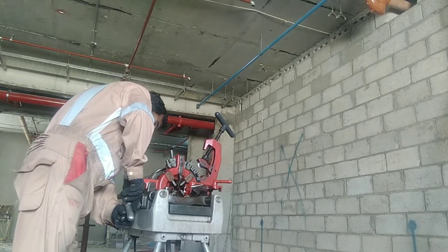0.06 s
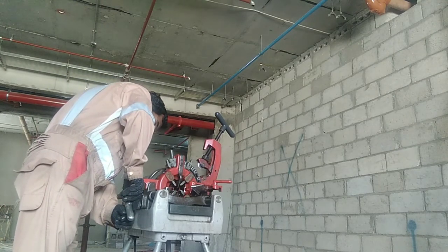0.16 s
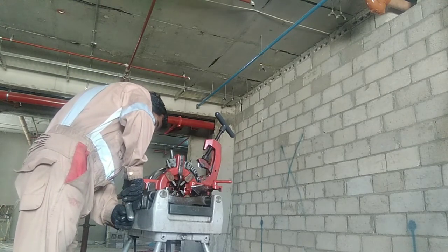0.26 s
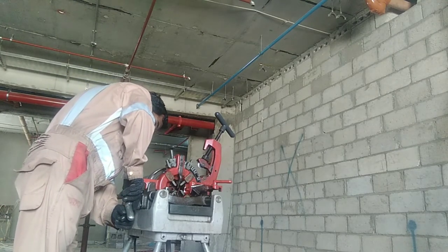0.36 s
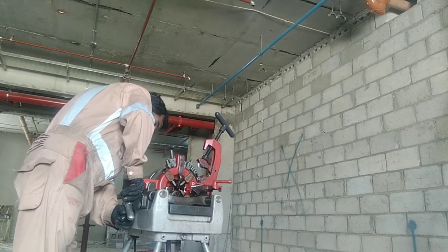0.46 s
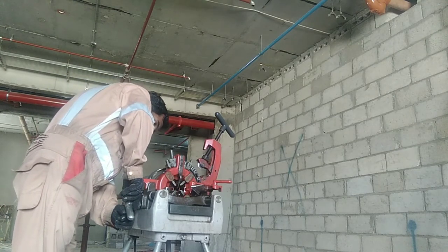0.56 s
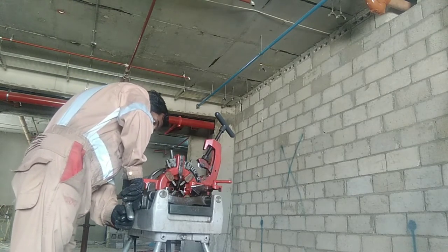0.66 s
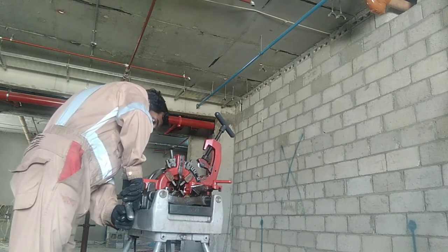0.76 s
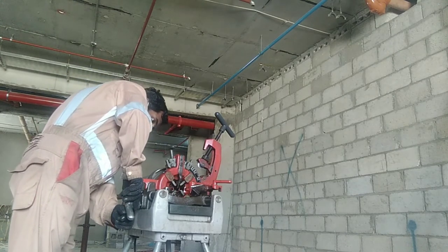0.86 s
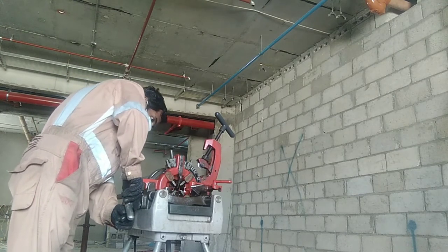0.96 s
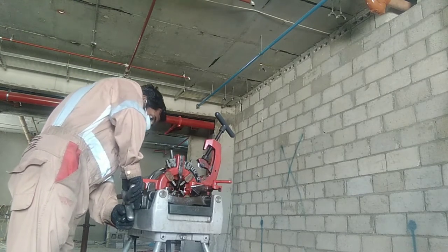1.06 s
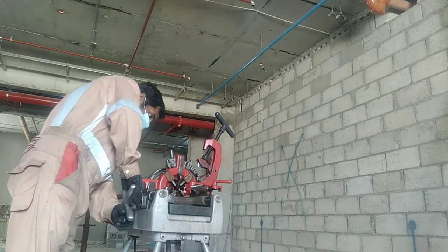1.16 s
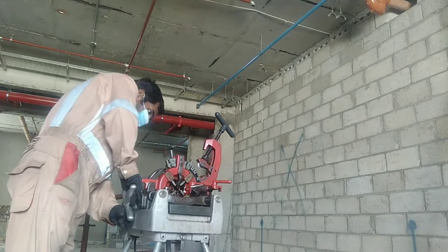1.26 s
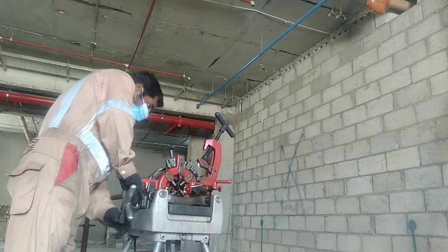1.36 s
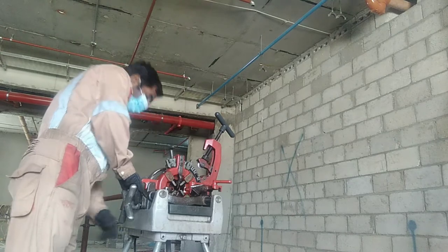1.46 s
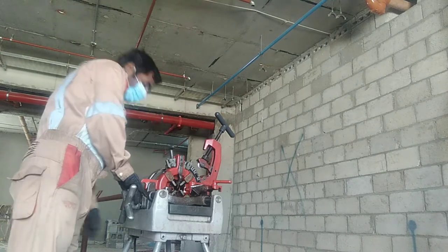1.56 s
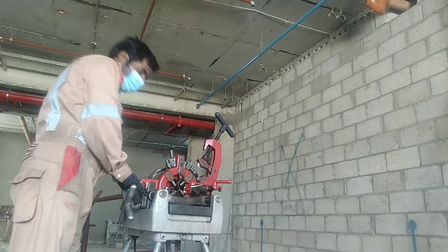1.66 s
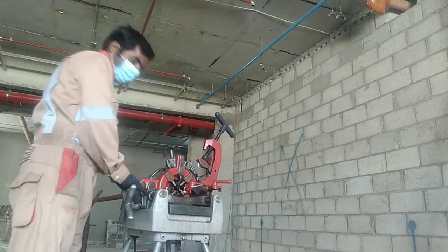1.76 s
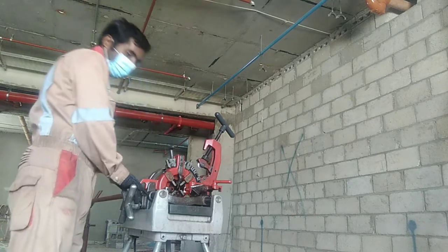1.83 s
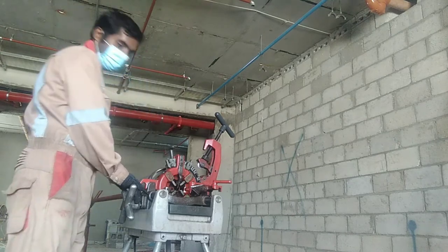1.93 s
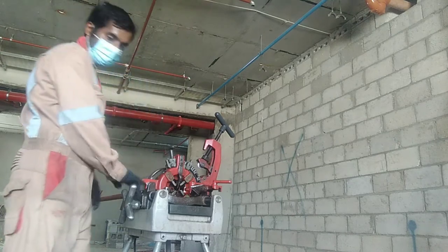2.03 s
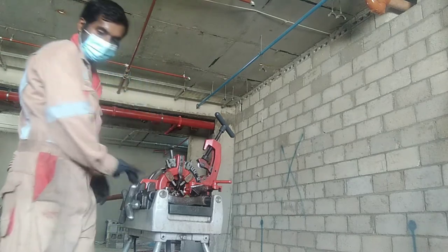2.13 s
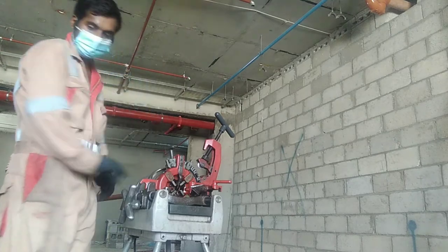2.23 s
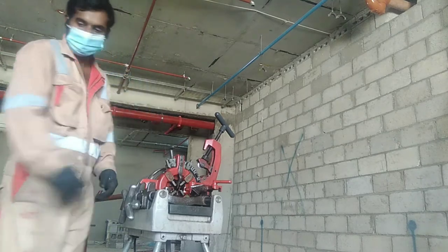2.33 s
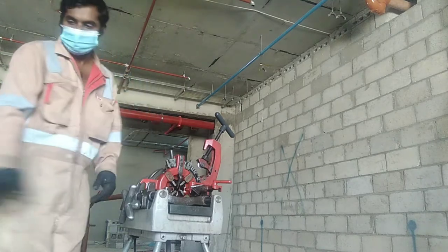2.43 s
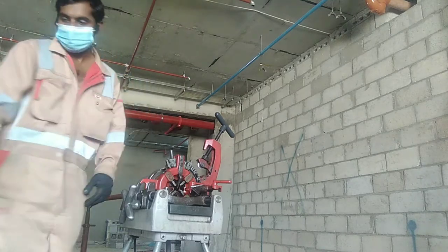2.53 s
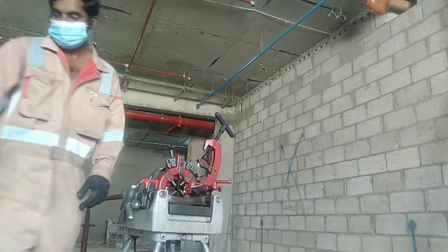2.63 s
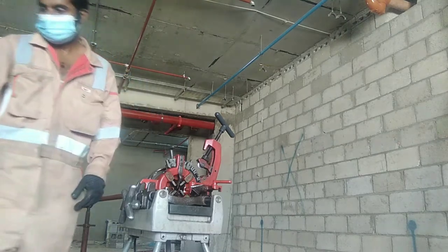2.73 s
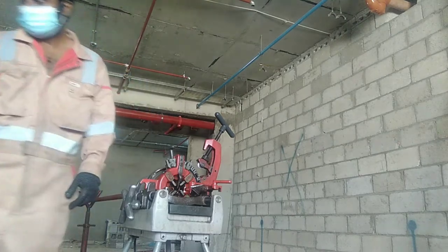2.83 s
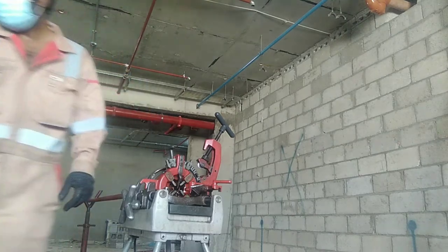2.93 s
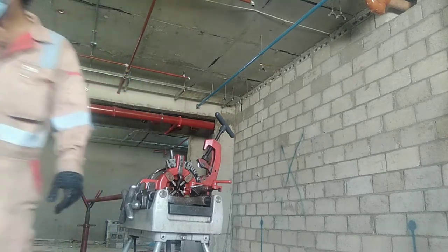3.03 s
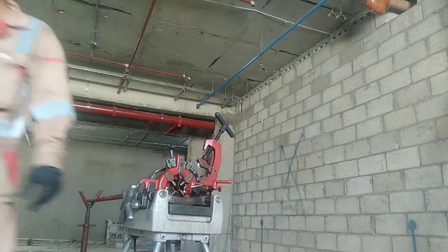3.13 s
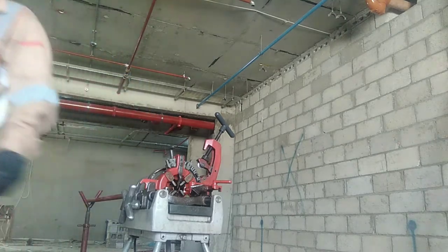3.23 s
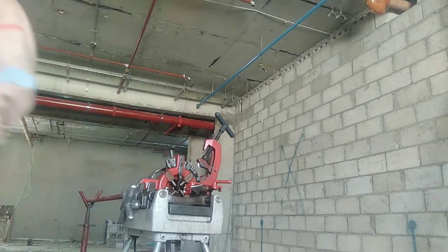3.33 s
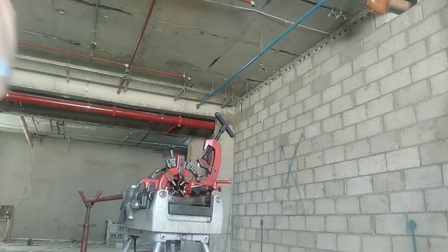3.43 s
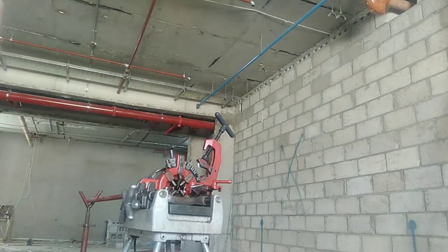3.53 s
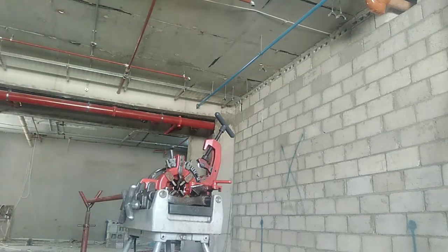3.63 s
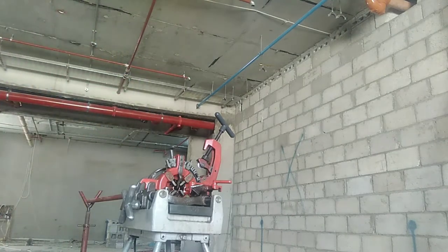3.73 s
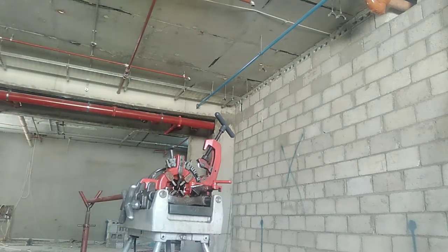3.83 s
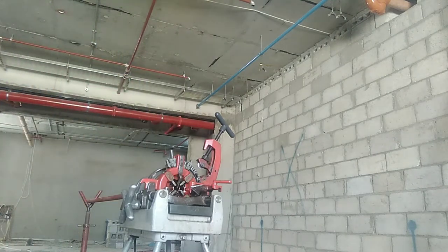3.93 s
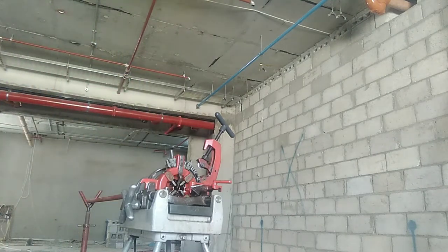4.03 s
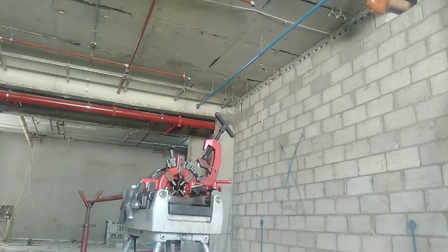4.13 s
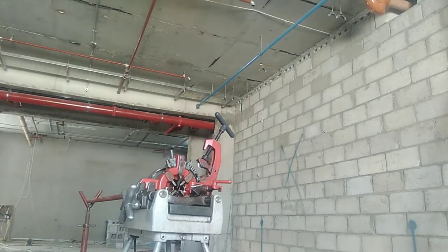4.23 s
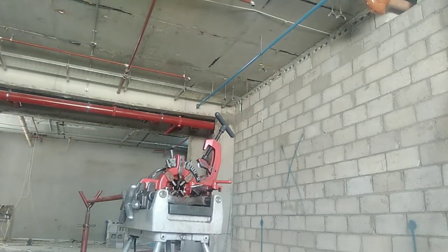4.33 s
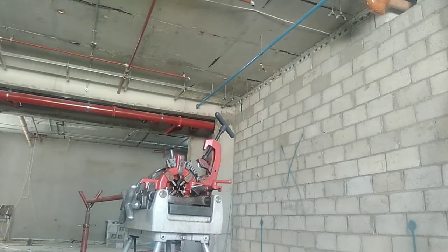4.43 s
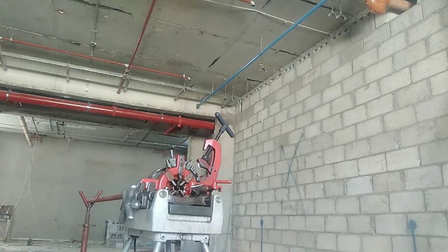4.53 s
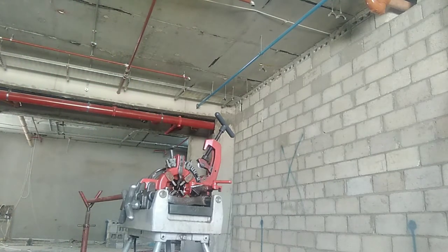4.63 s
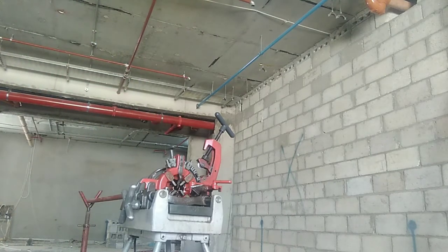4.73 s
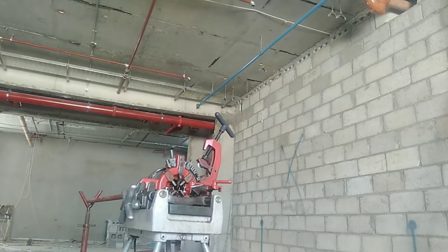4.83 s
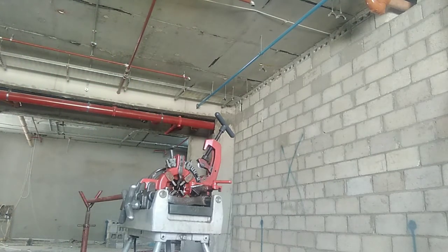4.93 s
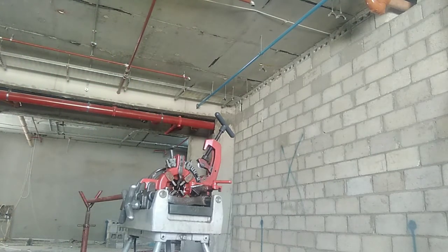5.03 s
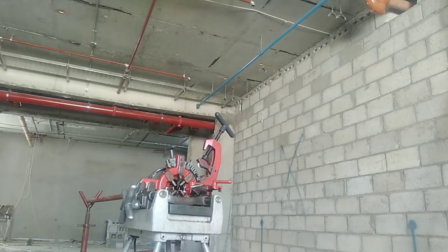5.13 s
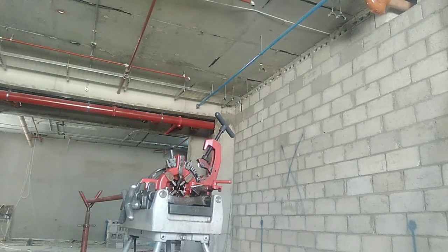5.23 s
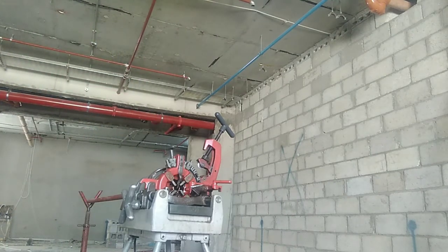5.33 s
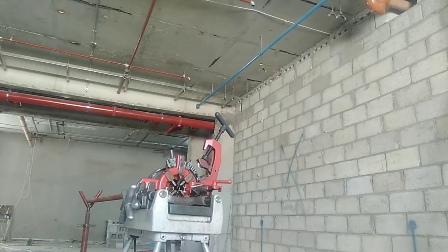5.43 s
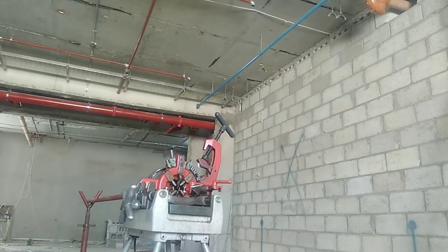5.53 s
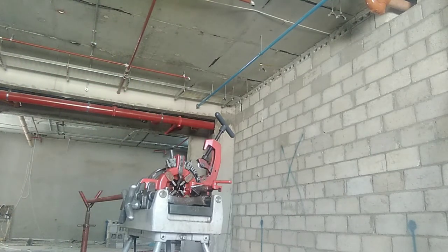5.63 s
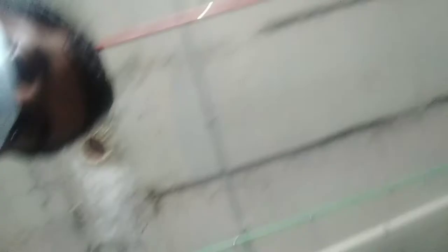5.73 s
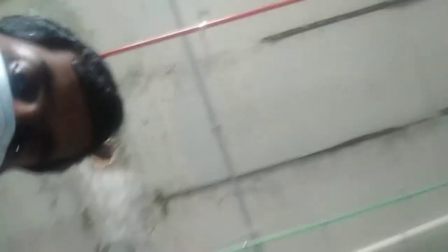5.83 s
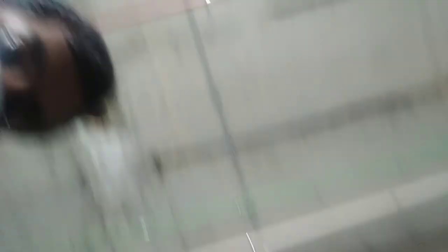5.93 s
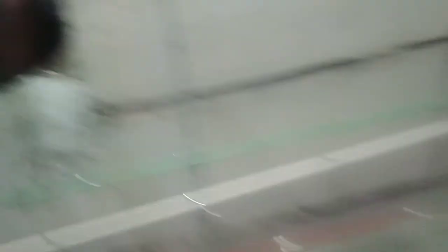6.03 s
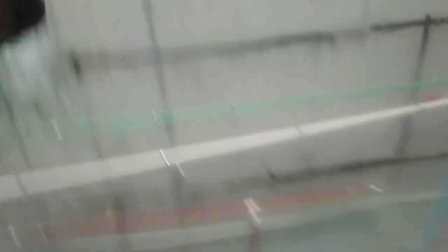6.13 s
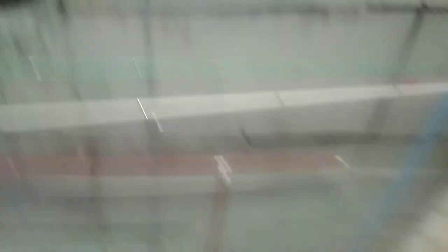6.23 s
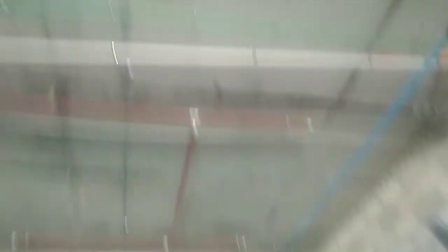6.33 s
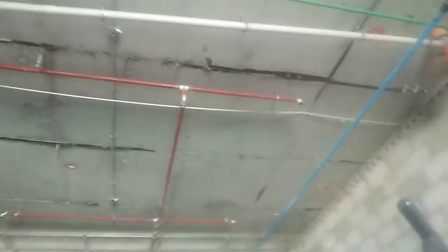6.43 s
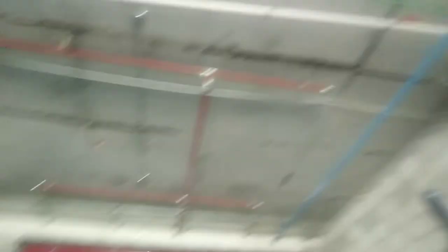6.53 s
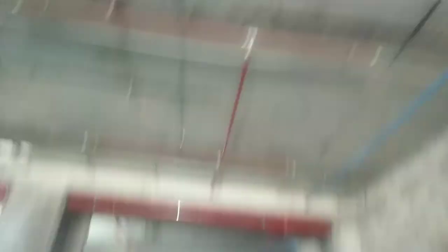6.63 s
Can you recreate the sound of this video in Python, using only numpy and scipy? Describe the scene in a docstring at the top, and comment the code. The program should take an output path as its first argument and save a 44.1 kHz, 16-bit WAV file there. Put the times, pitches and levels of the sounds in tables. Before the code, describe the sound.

In a bare, reverberant concrete hall, an electric pipe-threading machine runs with a rough gear growl and high wavering whine, sagging slightly in pitch. Dull thuds and a click come before it is switched off around two seconds; the whine slides down and dies. Then come steel clanks, hollow knocks, scuffs, ticks and three thin falling chirps, with close handling noise at the end. Stationary device microphone, stereo, with quiet tails thinned.

```python
"""An electric pipe-threading machine growls and whines in a bare concrete hall: gear noise, tooth and slot tones
all follow one rotor speed, which sags under power. Thuds and one click in the machine come while it runs. Switched
off at 2.08 s, it coasts to rest by drag and dry friction; its gear tone lingers in the hall. Steel clanks, ringing
modes, knocks, sharp ticks and scuffs follow. Shaped noise bursts make these blows and the lingering tone;
three falling chirps are swept sines. Convolution with decaying noise is the echo."""
import sys
import numpy as np
from scipy import signal
from scipy.fft import rfft, irfft, next_fast_len
from scipy.io import wavfile
from scipy.ndimage import uniform_filter1d

SR = 44100
rng = np.random.default_rng(int(sys.argv[2]) if len(sys.argv) > 2 else 0)


def inscribe(sig):
    """Save sig as 16-bit PCM at rate SR to the path in sys.argv[1].

    A 1-D sig is mono; a 2-D sig holds one channel per row.
    Samples are clipped to [-1, 1] before scaling.
    """
    pcm = np.round(np.clip(np.atleast_2d(sig).T, -1, 1) * 32767)
    wavfile.write(sys.argv[1], SR, pcm.astype(np.int16))


N = 295029
TIME = np.arange(N) / SR  # s
OFF_S = 2.08  # the power is cut
RUN_HZ = 314  # reference rotor speed, turns per second

# Level difference of the two ports. Each row: frequency in Hz, left minus right in dB.
PORT_BALANCE = [(60, -2.5), (110, 3), (200, -3), (370, 0.5), (680, -2.5), (1250, -2), (2290, -3),
                (4210, -14), (7730, -15), (14200, -6)]


def amp(db):
    """Logarithmic level: decibels to amplitude gain."""
    return 10 ** (np.asarray(db) / 20)


def read(points, hz):
    """Spectral envelope: a table interpolated on a log-frequency axis."""
    f, value = np.transpose(points)
    return np.interp(np.log(hz + 1), np.log(f + 1), value)


def curve(rows):
    """Linear interpolation of a control table at every sample."""
    return np.interp(TIME, *np.transpose(rows))


def evened(x):
    """Normalisation: the mean of the channels gets rms 1."""
    centre = np.atleast_2d(x).mean(0)
    return x / np.sqrt(np.mean(centre ** 2) + 1e-20)


def add(mix, s, sound):
    """Superposition: lays a sound into the mix at time s."""
    part = mix[..., round(s * SR):][..., :sound.shape[-1]]
    part += sound[..., :part.shape[-1]]


def drift(rate_hz):
    """Low-passed Gaussian noise: a slow random fluctuation of rms 1."""
    coarse = TIME[::8]
    size = next_fast_len(len(coarse))
    hz = np.fft.rfftfreq(size, coarse[1])
    spectrum = rfft(rng.standard_normal(size)) / (1 + (hz / rate_hz) ** 4)
    slow = irfft(spectrum, size)[:len(coarse)]
    return np.interp(TIME, coarse, evened(slow))


def lifts(modes, hz):
    """Resonance: the dB that a set of bell-shaped modes adds to a spectrum."""
    return sum(db / (1 + (2 * (hz - f) / width) ** 2) for f, width, db in modes)


def sides(db):
    """Intensity stereo: left and right gains for a level difference, at constant mean power."""
    g = amp(np.array([[.5], [-.5]]) * db)
    return g / np.sqrt((g ** 2).mean(0))


def noise(colour_db, size=N):
    """Partial coherence: coloured noise at two ports, more alike in the bass than in most of the treble."""
    # Each row: frequency in Hz, left-right likeness from 0 to 1.
    likeness = [(60, 0.87), (130, 0.78), (290, 0.79), (620, 0.75), (1360, 0.046), (2980, 0.39),
                (6500, 0.45), (14200, 0.18)]
    hz = np.fft.rfftfreq(size, 1 / SR)
    a, b = rfft(rng.standard_normal((2, size)))
    same = np.clip(read(likeness, hz), 0, 1)
    pair = np.array([a, same * a + np.sqrt(1 - same ** 2) * b])
    coloured = pair * sides(read(PORT_BALANCE, hz)) * amp(colour_db(hz))
    return evened(irfft(coloured, size))


def hall(x, share=1):
    """Diffuse reverberation: noise whose bands each decay at their own rate; share shortens the tail."""
    # Full decay times. Each row: frequency in Hz, time to fall 60 dB in seconds.
    decay_times = [(100, 0.42), (400, 0.63), (1200, 1.84), (2100, 1.97), (2900, 1.85), (4000, 1.06),
                   (6000, 0.83), (12000, 0.87)]
    hz, t, z = signal.stft(noise(np.zeros_like, size=65536), SR, nperseg=256)
    decay = amp(-60 * t / (share * read(decay_times, hz))[:, None])
    build_up = np.minimum(t / 0.0064, 1)
    tail = signal.istft(z * decay * build_up, SR, nperseg=256)[1]
    tail = tail / np.linalg.norm(tail.mean(0))
    return signal.fftconvolve(np.atleast_2d(x), tail, axes=1)[:, :N]


def burst(colour_db, rise, t60, tilt_db=0, grain=.3, modes_db=2):
    """Transient excitation: grainy noise that swells and decays exponentially, each burst favouring other modes."""
    t = TIME[:32768]
    mode_hz = np.geomspace(100, 15000, num=170)
    mode_lift_db = np.clip(rng.standard_normal(len(mode_hz)), -2, 2) * modes_db
    modes = np.transpose([mode_hz, mode_lift_db])

    def burst_db(hz):
        tilt = tilt_db * np.log2(np.maximum(hz, 500) / 2500)  # dB per octave
        return colour_db(hz) + read(modes, hz) + tilt

    sound = noise(burst_db, size=len(t))
    # different bands flare from moment to moment, as when a contact point wanders
    z = signal.stft(sound, nperseg=256)[2]
    flare = uniform_filter1d(rng.standard_normal(z.shape[1:]), size=5, axis=0)
    flare = uniform_filter1d(flare, size=4, axis=1)
    flared = z * amp(2.65 * flare / flare.std())
    sound = evened(signal.istft(flared, nperseg=256)[1][:, :len(t)])
    shudder = evened(uniform_filter1d(rng.standard_normal(len(t)), size=90))
    chatter = evened(np.exp(grain * shudder))
    envelope = np.minimum(t / rise, 1) * amp(-60 * np.maximum(t - rise, 0) / t60)
    shaped = sound * chatter * envelope
    return shaped * np.linalg.norm(envelope) / np.linalg.norm(shaped.mean(0))


def band_db(hz, centre, width):
    """Band-pass response in dB about a centre in Hz, its width in octaves."""
    return -20 * np.log10(1 + (np.log2((hz + 1) / centre) / width) ** 4)


def rotor():
    """Rotational dynamics: speed sags under power, then viscous drag and dry friction brake it to rest."""
    # Speed under power. Each row: time in seconds, speed in turns per second.
    powered_speed = [(0, 342), (.13, 339), (.3, 336), (.45, 332.7), (.75, 326.7), (.95, 320.8),
                     (1.17, 319.5), (1.32, 316), (1.45, 316.6), (1.62, 317.6), (1.75, 316), (1.85, 314.3),
                     (2.06, 314.2)]
    coast_s, friction_hz_per_s = 1.6, 196  # time constant of the drag; steady loss to dry friction
    dry_hz = friction_hz_per_s * coast_s
    drag = np.exp(-np.maximum(TIME - OFF_S, 0) / coast_s)
    return np.maximum((curve(powered_speed) + dry_hz) * drag - dry_hz, 0)


def slowing(speed, loss_db):
    """Power law of speed: gain of a sound that loses loss_db with each halving."""
    return (speed / RUN_HZ) ** np.log2(amp(abs(loss_db)))


def stand(speed, turns):
    """Forced resonance: the reduction shaft shakes the stand, hardest as its speed crosses the stand's mode."""
    shaft_ratio, mode_hz, width_hz = .512, 162.5, 9
    shaft = np.exp(2j * np.pi * shaft_ratio * turns) * speed / RUN_HZ
    r = np.exp(-np.pi * width_hz / SR)
    pole = r * np.exp(2j * np.pi * mode_hz / SR)
    once = signal.lfilter([1 - r], [1, -pole], shaft)
    twice = signal.lfilter([1 - r], [1, -pole], once)
    level = amp(-36 + 1.5 * drift(20))  # dB about resonance
    return level * twice * np.exp(1j * 0.12 * drift(9.8))


def gears(speed, turns):
    """Structure-borne noise: teeth and brushes rattle the housing; its hiss throbs with the shaft."""
    # Noise spectrum. Each row: frequency in Hz, density in dB per Hz.
    body_colour = [(35, -44), (60, -21.5), (128, -8.5), (161, -16), (194, -9), (328, -3.5), (385, -6.5),
                   (442, -4), (669, -5), (1390, -10.5), (2840, -8), (3490, -12.5), (5920, -14),
                   (9160, -23.5), (10200, -28), (14500, -39.5)]
    # Ringing of the cast housing. Each row: frequency in Hz, width in Hz, lift in dB.
    housing_modes = [(232, 12, -4), (279.6, 13, 2.5), (298, 12, -2.5), (375, 70, -7), (441, 55, 9),
                     (490, 12, 3.5), (515, 14, -14.5), (537, 13, 9), (570, 25, 1.5), (724, 79, 4.5),
                     (747, 12, 10), (837, 14, 5), (1592, 82, 7), (1700, 45, 6), (2168, 70, 5),
                     (2317, 160, 5), (2730, 31, 8), (2914, 140, 4.5), (3150, 97, 3.5), (3640, 21, 5.5),
                     (5300, 59, 9), (6050, 54, 8.5), (6580, 250, 4), (7250, 93, 11), (9100, 530, 2)]
    hz = np.fft.rfftfreq(N, 1 / SR)
    rattle = rfft(noise(lambda hz: read(body_colour, hz) + lifts(housing_modes, hz)))

    def band(lo, hi):
        return irfft(rattle * (1 / (1 + (hz / hi) ** 6) - 1 / (1 + (hz / lo) ** 6)), N)

    drone, grind, hiss = band(130, 390), band(390, 1800), band(1800, 20000)
    # the drone fades first as the gears slow
    body = grind + drone * np.minimum(speed / 170, 1) ** 2
    body = body / band(250, 1500).mean(0).std()
    hiss = hiss / band(2500, 9000).mean(0).std()
    # one throb every two turns, one every turn
    throb = 1 + 0.026 * np.cos(np.pi * turns) + 0.062 * np.cos(2 * np.pi * turns)
    slap = amp(0.61 * drift(24))
    # levels in dB at the reference speed, losses in dB per halving of speed
    low = amp(-34) * slowing(speed, 7) * body
    high = amp(-35.5) * slowing(speed, 9) * throb * hiss
    return slap * (low + high)


def teeth(speed, turns, swing):
    """Periodic excitation: uneven teeth repeat every turn of the big gear, about thirty a second, and growl."""
    # Harmonics, as multiples of the big gear's speed.
    tooth_orders = [3, 4, 7, 8, 10, 13, 14, 15, 16, 19, 20, 21, 22, 23, 25, 26, 31, 33, 35]
    # Level of each harmonic in dB at the reference speed.
    tooth_levels = [-57, -58.5, -51, -50.5, -45, -51.5, -49, -50, -52, -50.5, -45.5, -49.5, -56, -61, -59,
                    -52.5, -51.5, -59, -52.5]
    gear_ratio, loss_db, wobble = .1029, 22.5, 0.33  # turns per rotor turn; dB per halving; radians
    growl = np.zeros(N)
    for order, db in zip(tooth_orders, tooth_levels):
        # the deepest tones are heard only as the stand swings
        carried = swing / swing.max() if order < 5 else 1
        level = amp(db + 2 * drift(4))
        phase = 2 * np.pi * order * gear_ratio * turns + wobble * drift(7)
        growl += carried * level * np.cos(phase)
    return np.sqrt(2) * growl * slowing(speed, loss_db)


def whine(speed, turns):
    """Gear-mesh tones: louder once the teeth run slack, gliding through the casing modes as the rotor coasts."""
    # Gear tones, as multiples of the rotor speed.
    mesh_orders = [1, 1.6, 2.1, 3, 6, 9, 9.35, 10, 12]
    # Each row, one per tone: level under power in dB, dB gained when the teeth run slack,
    # dB lost per halving of speed, phase wobble in radians.
    mesh_tones = [(-51, 6, 21, .6), (-57, 10, 16, 1.7), (-55.5, 5.5, 4, 1), (-54, 3, 9, .6),
                  (-59.5, 11, 5.5, .5), (-53, 5.5, 2.5, .7), (-58, 9, 2.5, .9), (-54, 1.5, 3, .5),
                  (-59, 8.5, 7, .6)]
    # Casing modes that a passing tone makes sing. Each row: frequency in Hz, width in Hz, lift in dB.
    casing_modes = [(339, 12, 5), (470, 60, 4), (780, 110, 8), (1550, 450, 3), (2300, 300, 3),
                    (2840, 90, 5), (3170, 60, 5)]
    slack_wobble, slack_rattle_hz = .8, 42  # radians; rate of the loose teeth
    tones, direct = np.zeros(N), np.zeros((2, N))
    halvings = np.maximum(np.log2(RUN_HZ / (speed + 1)), 0)
    slack = np.clip((TIME - OFF_S) / 0.059, 0, 1)
    for order, (db, slack_db, loss_db, wobble) in zip(mesh_orders, mesh_tones):
        sung_db = lifts(casing_modes, order * speed)
        level_db = db + slack * slack_db + sung_db - loss_db * halvings + 2.2 * drift(7)
        jitter = wobble * drift(20) + slack * slack_wobble * drift(slack_rattle_hz)
        tone = amp(level_db) * np.sqrt(2) * np.cos(2 * np.pi * order * turns + jitter)
        tones += tone
        direct += tone * sides(read(PORT_BALANCE, order * speed))
    force = np.clip((speed - 32) / 45, 0, 1)  # gone below 32 turns per second
    return direct * force + amp(-5) * hall(tones * force)


def magnetic(speed, turns):
    """Magnetic slot forces: whistles at whole multiples of rotor speed, which stop with the power."""
    # Whistles, as multiples of the rotor speed, lowest first.
    slot_orders = [6, 12, 18, 21]
    # Level of the two lowest. Each row: time in seconds, first level in dB, second level in dB.
    low_levels = [(0, -43, -36), (.1, -43.5, -44.5), (.17, -47.5, -55.5), (.28, -45.5, -43),
                  (.38, -50, -53.5), (.46, -56.5, -34.5), (.62, -49, -50.5), (.72, -44.5, -50.5),
                  (1.0, -44, -47), (1.28, -45, -40.5), (1.42, -39.5, -49.5), (1.53, -52, -43.5),
                  (1.61, -36, -41), (1.76, -42.5, -43), (1.86, -46.5, -36), (2.05, -37, -33.5)]
    # Level in dB of the two highest, away from any mode.
    high_levels = [-51.5, -53]
    # Motor shell modes the two highest sweep through. Each row: frequency in Hz, width in Hz, lift in dB.
    shell_modes = [(5655, 25, 9), (5695, 35, 11), (5890, 50, 9), (6010, 110, 16), (6105, 30, 10),
                   (6603, 25, 13), (6660, 60, 6)]
    out = np.zeros((2, N))
    powered = np.clip((OFF_S - TIME) / .015, 0, 1)
    times, *low = np.transpose(low_levels)
    levels = [np.interp(TIME, times, db) for db in low]
    for order, db in zip(slot_orders[2:], high_levels):
        levels.append(db + lifts(shell_modes, order * speed))
    for order, level_db in zip(slot_orders, levels):
        phase = 2 * np.pi * order * turns + .3 * drift(25)
        tone = amp(level_db + 1.8 * drift(20)) * np.cos(phase)
        out += np.sqrt(2) * powered * tone * sides(read(PORT_BALANCE, order * speed))
    return out + amp(-10) * hall(out.mean(0))


def rumble(speed, swing):
    """Addition of powers: floor thrum of machine and stand, plus thuds that swell, drop and leave a low tail."""
    # Each row: frequency in Hz, density in dB per Hz.
    floor_colour = [(20, -60), (35, -27.5), (56, -1), (85, 4.5), (125, -6.5), (160, -28.5), (220, -32),
                    (480, -86.5)]
    # Dull thuds. Each row: start in seconds, level in dB.
    thuds = [(1.0, -38.5), (1.1, -38), (1.48, -39), (2.43, -44), (2.51, -48), (2.66, -53), (2.82, -70),
             (3.37, -53), (3.64, -48.5), (3.85, -56), (4.031, -58.5), (4.506, -47.5), (4.668, -40),
             (4.72, -39.5), (4.83, -41), (4.877, -35), (5.019, -46), (5.131, -53.5), (5.278, -57.5),
             (5.75, -49.5), (5.959, -54), (6.02, -53), (6.241, -58.5)]
    rise_s, t60_s, tail_db, tail_t60_s = .018, 0.32, -28.5, 1  # the tail's level is relative to the thud
    machine = amp(-59) * slowing(speed, 3)
    shake = amp(-16) * swing
    power = amp(-72) ** 2 + machine ** 2 + shake ** 2
    for s, db in thuds:
        rise = np.clip((TIME - s) / rise_s, 0, 1)
        age = np.maximum(TIME - s - rise_s, 0)
        fall = amp(-60 * age / t60_s) + amp(tail_db - 60 * age / tail_t60_s)
        power = power + (amp(db) * rise * fall) ** 2
    thrum = noise(lambda hz: read(floor_colour, hz))
    # level out the noise's own swells before the envelope is applied
    thrum_power = signal.fftconvolve((thrum ** 2).mean(0), np.hanning(4096), "same")
    return evened(thrum / np.sqrt(thrum_power)) * np.sqrt(power)


def background():
    """Stationary broadband noise: the quiet air of the hall."""
    # Each row: frequency in Hz, density in dB per Hz.
    air_colour = [(60, -4), (200, -6.5), (500, -10.5), (1200, -27), (2000, -21), (4000, -34.5), (8000, -22),
                  (14000, -30)]
    return amp(-70.5) * noise(lambda hz: read(air_colour, hz))


def click_and_scuffs():
    """Friction and light impact: a click in the running machine, then scuffs and taps close by after switch-off."""
    # The first row is the click. Each row: start in seconds, level in dB, rise in seconds,
    # time to fall 60 dB in seconds, tilt in dB per octave, left minus right in dB, echo in dB.
    contact_events = [(1.819, -21.5, 0.00035, 0.0066, -12, 2, -24), (3.747, -49.5, .0008, 0.085, -9, 5, 1),
                      (3.766, -52, 0.014, 0.67, -6.5, 5, -2.5), (3.777, -43, 0.00056, .02, -6, 8, -12),
                      (3.845, -42.5, .0008, 0.21, -6, 10, -26), (3.86, -49, 0.058, 0.53, -8.5, 7, -24),
                      (4.276, -39, 0.00038, 0.03, -2.5, 12, -7), (4.289, -51, 0.00045, .03, -8.5, -6, -6),
                      (4.304, -55, 0.00053, 0.066, -4, -20, -11), (4.717, -23, 0.00034, 0.0075, 9, 14, -25),
                      (5.743, -41, 0.00052, 0.071, -5.5, 9, -7.5), (5.759, -51, 0.0071, 0.24, -8.5, 5, -25),
                      (5.828, -56, 0.0075, 0.16, -6, -4, -15), (5.869, -64.5, 0.03, 1, 4.5, -16, -20),
                      (5.987, -46, 0.0035, 0.84, -4, 7.5, -34), (6.012, -45.5, 0.045, 0.19, -8, -21, -17),
                      (6.045, -34, 0.00055, 0.0084, -1, -20, -21.5),
                      (6.499, -62.5, 0.0054, 0.24, -1, -11, 15.5),
                      (6.56, -45.5, 0.0034, .053, -8.5, -3, -12)]
    # Each row: frequency in Hz, density in dB per Hz.
    contact_colour = [(100, -22.5), (400, -21), (800, -10.5), (1800, -0.5), (3000, 4.5), (5000, 10.5),
                      (9000, 10.5), (14000, 1)]
    near, sent = np.zeros((2, N)), np.zeros(N)
    for s, db, rise, t60, tilt_db, pan_db, echo_db in contact_events:
        sound = amp(db) * burst(lambda hz: read(contact_colour, hz), rise, t60, tilt_db, grain=0.13)
        add(near, s, sound * sides(pan_db))
        add(sent, s, amp(echo_db) * sound.mean(0))
    return near + hall(sent)


def clanks():
    """Impact of steel on steel: a sharp onset excites broad resonances, which echo in the hall."""
    # Each row: start in seconds, level in dB, time to fall 60 dB in seconds, tilt in dB per octave,
    # left minus right in dB, echo in dB.
    clank_events = [(2.789, -40, 0.5, 0, 1, -4), (3.093, -59.5, 0.074, 0.5, -16, 19),
                    (4.479, -47, 0.18, 4, 17, 3), (4.508, -44.5, 0.47, 3.5, 13, -18),
                    (4.589, -57, 0.1, -4.5, -7, 15), (4.634, -45, 0.42, -2, -3, -15),
                    (4.651, -40.5, 0.85, -2.5, -0.5, -13.5), (4.692, -43.5, 0.43, -4, 4, -18),
                    (4.713, -47.5, 0.58, 5, 9, -6), (4.793, -49, 1, -4.5, 4, -23),
                    (4.952, -57.5, 0.64, -5, -7, -15), (5.108, -50.5, 0.021, 4, 14, 2.5),
                    (6.241, -40, 0.61, 0, -3, -0.5), (6.433, -49.5, 0.45, -4.5, 1, -3.5),
                    (6.623, -69, 0.61, 2, 4, 18.5)]
    # Each row: frequency in Hz, density in dB per Hz.
    steel_colour = [(100, 1), (500, -57), (750, 1.5), (1100, -5.5), (1600, 7), (2700, 3), (4000, 8.5),
                    (5500, 5), (8000, -0.5), (12000, -10), (14000, -17)]
    # Each row: frequency in Hz, width in Hz, lift in dB.
    steel_modes = [(1082, 165, 16.5), (2940, 410, 3), (3900, 360, -5), (4840, 500, -0.5)]
    near, sent = np.zeros((2, N)), np.zeros(N)
    steel_db = lambda hz: read(steel_colour, hz) + lifts(steel_modes, hz)
    for s, db, t60, tilt_db, pan_db, echo_db in clank_events:
        sound = amp(db) * burst(steel_db, .0012, t60, tilt_db, grain=0.31)
        add(near, s, sound * sides(pan_db))
        add(sent, s, amp(echo_db) * sound.mean(0))
    return near + hall(sent)


def rings():
    """Free vibration: tight clusters of modes in steel parts sound on after a blow."""
    # Each row: start in seconds, level in dB, centre in Hz, time to fall 60 dB in seconds.
    ring_events = [(2.79, -46, 4300, 0.26), (4.275, -52.5, 1760, 0.024), (4.275, -45.5, 4680, 0.016),
                   (4.281, -74, 2820, 1.8), (4.478, -57, 2010, 0.14), (4.645, -43, 1050, 0.22),
                   (4.64, -48.5, 2630, 0.69), (4.64, -47, 3900, 0.63), (4.65, -46.5, 4980, 0.44),
                   (6.241, -38, 3660, 0.24), (6.241, -43, 2840, 0.17), (6.26, -50, 1206, 1.25),
                   (6.42, -55, 905, 0.52)]
    out = np.zeros((2, N))
    for s, db, centre, t60 in ring_events:
        cluster_db = lambda hz: band_db(hz, centre, .055)
        add(out, s, amp(db) * burst(cluster_db, 0.0033, t60, grain=0))
    return out + amp(-11.5) * hall(out.mean(0))


def banded_bursts():
    """Band-limited resonance: lingering gear tone, then hollow knocks, rattles and short sharp ticks and cracks."""
    # The first three rows are the coasting gears' tone lingering in the hall; the ticks and cracks last 11-35 ms.
    # Each row: start in seconds, level in dB, centre in Hz, width in octaves, rise in seconds,
    # time to fall 60 dB in seconds.
    band_events = [(2.902, -53.5, 477, 0.15, 0.14, 0.58), (3.06, -52, 930, 0.55, 0.076, 1),
                   (3.15, -54, 840, 0.21, 0.025, 1.2), (3.267, -54.5, 1380, 0.12, 0.021, 0.74),
                   (3.479, -59, 1440, 0.3, 0.047, 1.6), (3.52, -66.5, 827, 0.35, 0.034, 1.6),
                   (3.792, -38, 2080, 0.39, .0006, 0.011), (3.846, -43, 1880, .45, 0.00052, .035),
                   (3.837, -50, 398, 0.33, 0.008, 0.86), (3.915, -52, 446, 0.26, 0.0059, 0.55),
                   (4.019, -57.5, 425, 0.26, 0.0061, 0.54), (4.588, -48, 2060, 0.36, .0006, 0.028),
                   (4.611, -45, 2000, .22, .001, 0.026), (4.654, -54.5, 480, 0.17, 0.0087, 0.54),
                   (4.959, -55.5, 990, 0.49, 0.043, 0.41), (4.95, -58.5, 2300, 0.42, 0.07, 1),
                   (5.11, -50, 2250, 0.96, .0006, 0.029), (5.115, -62, 2160, .55, .01, 1.1),
                   (5.448, -71, 1803, 0.096, 0.054, 1), (5.744, -54.5, 330, 0.63, 0.0033, 0.27),
                   (6.046, -44, 1400, 0.31, 0.0005, 0.021), (6.451, -55, 484, 0.064, 0.0078, 0.32),
                   (6.5, -49, 800, 0.33, .007, 0.41), (6.509, -46.5, 310, 0.57, 0.0057, 0.47),
                   (6.57, -56, 388, 0.089, 0.0088, 1.6)]
    near, sent = np.zeros((2, N)), np.zeros(N)
    for s, db, centre, width, rise, t60 in band_events:
        sound = amp(db) * burst(lambda hz: band_db(hz, centre, width), rise, t60, grain=0.23)
        add(near, s, sound)
        add(sent, s, amp(-25) * sound.mean(0))
    return near + hall(sent)


def chirps():
    """Frequency modulation: thin whistles glide down by more than an octave at an uneven pace, their rasp
    easing; strong echo."""
    # Each row: start in seconds, level in dB, length in seconds.
    chirp_events = [(3.188, -52.5, .098), (3.45, -51.5, .103), (5.265, -55.5, .098)]
    # The course of every chirp. Each row: share of its length, frequency in Hz, relative level in dB.
    chirp_course = [(0, 7900, -14), (.18, 7200, -5), (.28, 6400, -10), (.33, 6100, 5), (.5, 5200, -10),
                    (.62, 4700, -1), (.75, 4400, -4), (.86, 3850, 3), (1, 3250, -10)]
    out = np.zeros(N)
    share, shape_hz, shape_db = np.transpose(chirp_course)
    for s, db, length in chirp_events:
        along = np.linspace(0, 1, int(length * SR))
        size = len(along)
        hz = np.interp(along, share, shape_hz)
        rasp = (.06 * drift(900) + .025 * drift(120))[:size] * (1 - .6 * along)
        level_db = db + np.interp(along, share, shape_db) + 2.5 * drift(250)[:size]
        swell = signal.windows.tukey(size, .1) * amp(level_db)
        phase = 2 * np.pi * np.cumsum(hz * (1 + rasp)) / SR
        add(out, s, swell * np.sin(phase))
    return out + amp(2) * hall(out, share=.8)


def scene():
    """Superposition of the machine, driven by one rotor phase, and the site around it."""
    speed = rotor() * (1 + .0004 * drift(6))
    turns = np.cumsum(speed) / SR
    hum = stand(speed, turns)
    swing = abs(hum)
    machine = hum.real + gears(speed, turns) + teeth(speed, turns, swing)
    machine = machine + whine(speed, turns) + magnetic(speed, turns)
    bursts = click_and_scuffs() + clanks() + rings() + banded_bursts()
    return machine + rumble(speed, swing) + background() + bursts + chirps()


def record(dry):
    """Port delay, spectral gating and band limit: right lags, quiet tails are thinned, the top is cut."""
    # Base threshold of the noise suppressor. Each row: frequency in Hz, level in dB per bin.
    gate_floor = [(100, -112), (400, -101), (1000, -101), (2500, -100), (5000, -102), (9000, -104),
                  (14000, -106)]
    ports = np.array([dry[0], np.pad(dry[1], (4, 0))[:N]])  # right port 4 samples later
    hz, _, z = signal.stft(ports, SR, nperseg=1024, noverlap=768)
    power = uniform_filter1d((abs(z) ** 2).mean(0), size=3, axis=0)
    power = abs(uniform_filter1d(power, size=5, axis=1))
    threshold = amp(read(gate_floor, hz) + 18.5)[:, None] ** 2
    keep = np.maximum(power / (power + threshold), amp(-14.5))
    thinned = signal.istft(z * keep, SR, nperseg=1024, noverlap=768)[1][:, :N]
    low_pass = signal.firwin(511, 14400, window=("kaiser", 9), fs=SR)  # edge in Hz
    return signal.oaconvolve(thinned, low_pass[None], "same")


dry = scene()
out = record(dry)
inscribe(out)
```